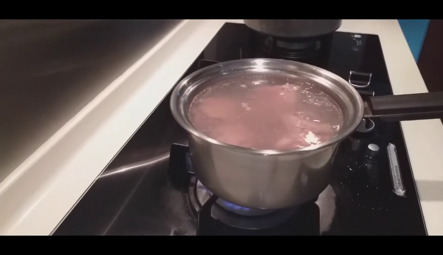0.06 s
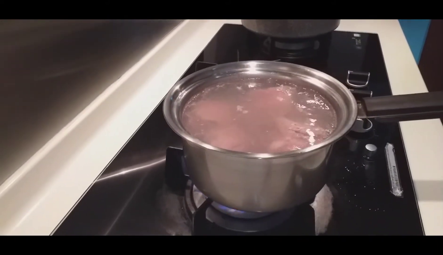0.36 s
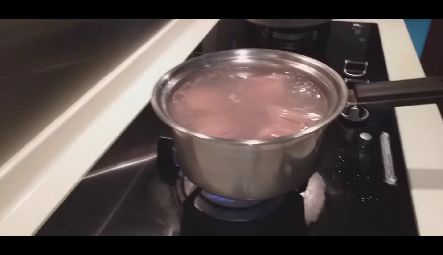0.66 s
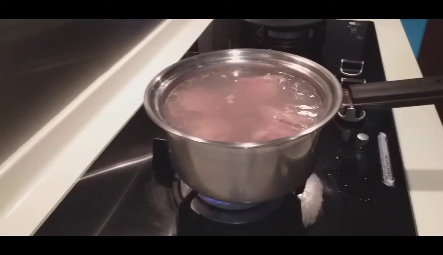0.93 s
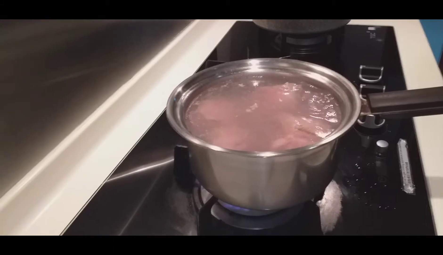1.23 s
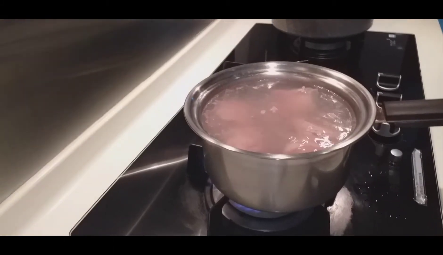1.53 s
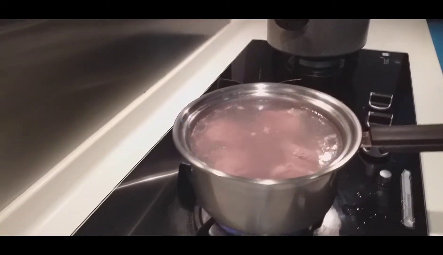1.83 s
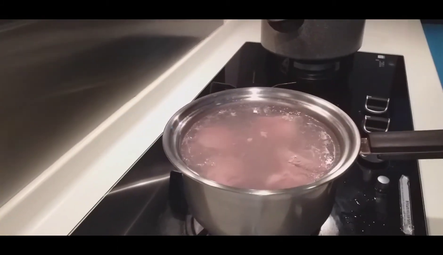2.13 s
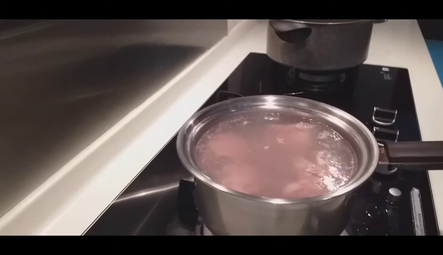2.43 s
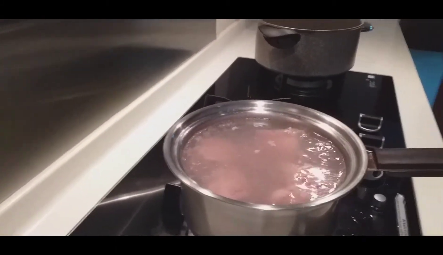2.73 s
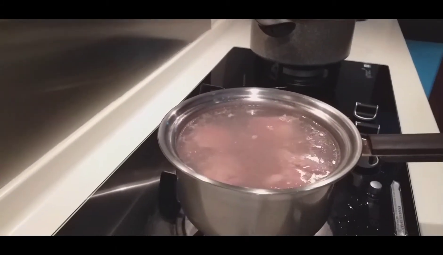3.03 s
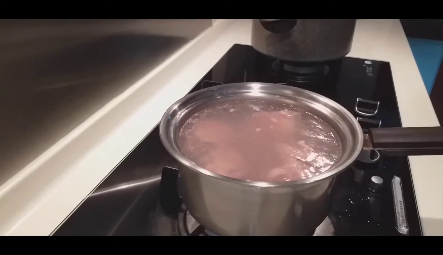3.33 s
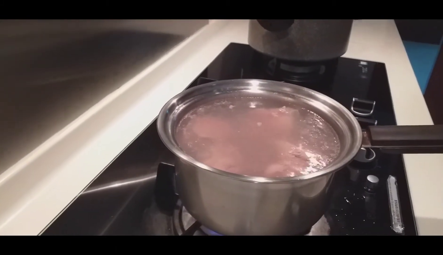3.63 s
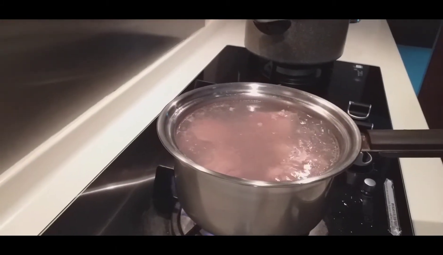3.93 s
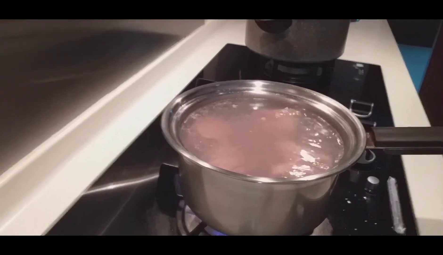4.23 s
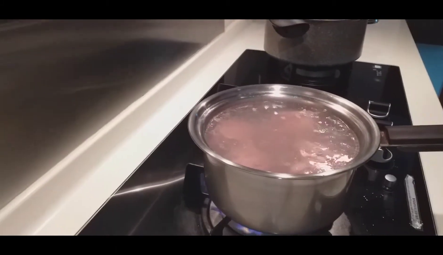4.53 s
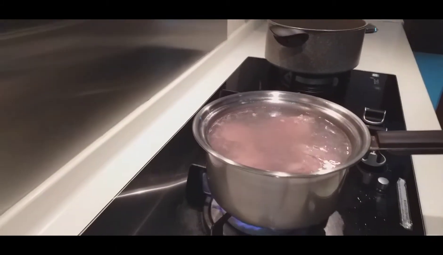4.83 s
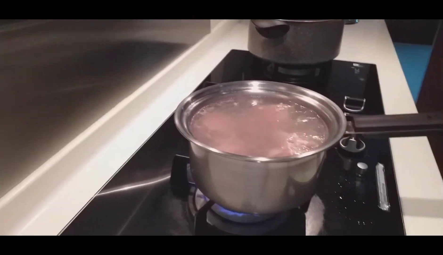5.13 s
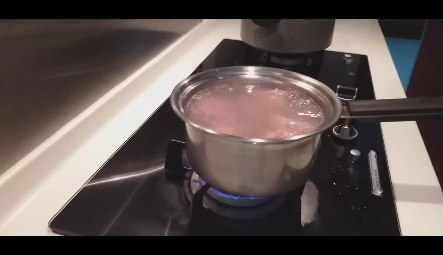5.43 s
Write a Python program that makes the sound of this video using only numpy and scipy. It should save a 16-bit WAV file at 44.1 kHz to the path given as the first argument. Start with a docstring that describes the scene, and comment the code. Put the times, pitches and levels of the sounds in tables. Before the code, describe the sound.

A bright simmering hiss and low gas burner rush in a small kitchen, interrupted by clacking dishes, hollow bumps and metallic taps.

```python
"""A sharp clack and a dull bump sound over the bright sizzle of a steel saucepan in a small kitchen.
The sizzle is tiny steam bubbles collapsing; larger ones pop, droplets spit and a gas flame rushes below.
Nearby, dishes are set down and a metal pot is tapped, ringing faintly, among a few hollow bumps.
Sizzle and flame sink around the loudest clatter and come back near the end, where the boil flares up."""
import sys
import numpy as np
from scipy import signal
from scipy.fft import rfft, irfft, next_fast_len
from scipy.io import wavfile

SR = 44100
rng = np.random.default_rng(int(sys.argv[2]) if len(sys.argv) > 2 else 0)


def output_pcm(signal):
    """Save a mono or channel-first signal as 16-bit PCM at the path in sys.argv[1].

    Samples are clipped to [-1, 1] before scaling.
    """
    pcm = np.clip(np.atleast_2d(signal).T, -1, 1) * 32767
    wavfile.write(sys.argv[1], SR, np.round(pcm).astype(np.int16))


N = 250488
TIME = np.arange(N) / SR

# The kitchen's echo. Each row: frequency in Hz, t60 (the seconds a sound takes to fade by 60 dB).
ROOM = [(100, 0.14), (500, 0.51), (2000, 0.58), (4000, 0.3), (8000, 0.43)]
WAVERS_PER_S = 9   # how quickly the levels of sizzle and spray wander


def from_db(db):
    """Turn decibels into a gain to multiply by."""
    return 10 ** (np.asarray(db) / 20)


def rms_one(x):
    """Scale a signal so that its average strength (rms) is 1."""
    return x / np.sqrt(np.mean(x ** 2) + 1e-20)


def at_hz(points, hz):
    """Read between the rows of a frequency table, with octaves evenly spaced."""
    row_hz, value = np.transpose(points)
    return np.interp(np.log(np.maximum(hz, 1)), np.log(row_hz), value)


def colour(x, spectrum):
    """Give a sound the tone of a table of Hz and dB; white noise keeps its power."""
    size = 2 * next_fast_len(len(x))
    gain = rms_one(from_db(at_hz(spectrum, np.linspace(0, SR / 2, size // 2 + 1))))
    cepstrum = irfft(np.log(gain))[:size // 2]
    cepstrum[1:] *= 2   # minimum phase: nothing sounds ahead of a click
    return irfft(rfft(x, size) * np.exp(rfft(cepstrum, size)))[:len(x)]


def band(x, low_hz, high_hz):
    """Keep the sound between two frequencies."""
    edges = np.clip([low_hz, high_hz], [10, 20], [.44 * SR, .45 * SR])
    return signal.sosfilt(signal.butter(2, edges, "band", fs=SR, output="sos"), x)


def ring(clicks, hz, t60):
    """Each click starts a fading tone as strong as the click."""
    decay = np.exp(-np.log(1000) / (t60 * SR))
    angle = 2 * np.pi * hz / SR
    return signal.lfilter([0, np.sin(angle)], [1, -2 * decay * np.cos(angle), decay ** 2], clicks + 1e-18)


def fade(t60):
    """A one-second curve that drops 60 dB every t60 seconds."""
    return np.exp(-np.log(1000) * TIME[:SR] / t60)


def ping(hz, t60):
    """One second of a fading pure tone."""
    return np.sin(2 * np.pi * hz * TIME[:SR]) * fade(t60)


def burst(hz, width_hz, envelope):
    """A puff of noise around a pitch, with the shape and energy of the envelope."""
    top_hz = width_hz / 2 + np.hypot(hz, width_hz / 2)
    sound = band(rng.standard_normal(SR + 2000), top_hz - width_hz, top_hz)[2000:] * envelope
    return sound * np.linalg.norm(envelope) / np.linalg.norm(sound)


def add(track, start_s, sound):
    """Mix a sound into the track at a given time."""
    start = max(round(start_s * SR), 0)
    track[start:start + len(sound)] += sound[:N - start]


def clicks_at(times, db):
    """Single clicks at given times and levels."""
    out = np.zeros(N)
    out[np.clip(np.round(times * SR).astype(int), 0, N - 1)] = from_db(db)
    return out


def drift(per_s):
    """A randomly wandering curve, typically about 1 away from zero."""
    knots = rng.standard_normal(4096)
    return rms_one(np.interp(TIME * per_s, np.arange(len(knots)), knots))


def grains(per_s, spread_db, clump_db):
    """Random clicks of uneven size, louder and softer in clumps."""
    sizes = from_db(spread_db * np.minimum(rng.exponential(1, N), 5)) * rng.choice([-1, 1], N)
    happens = rng.random(N) < per_s / SR
    return rms_one(sizes * happens * from_db(clump_db * drift(70)))


def room_tail():
    """One second of echo: noise in which each octave fades at its own speed."""
    edges = 40 * 2. ** np.arange(10)
    return sum(band(rng.standard_normal(SR), low, high) * fade(at_hz(ROOM, np.sqrt(low * high)))
               for low, high in zip(edges, edges[1:]))


TAIL = room_tail()


def in_kitchen(x, echo_db):
    """The direct sound plus its reflections from the walls."""
    return x + from_db(echo_db) * signal.fftconvolve(x, TAIL / np.linalg.norm(TAIL))[:N]


def dip(start_s=2.05, fall_s=0.64, depth_db=10.5, return_s=4.836, return_db_per_s=11.5):
    """The level change in dB shared by pan and flame: it falls, stays low, then climbs back."""
    fallen = depth_db * np.clip((TIME - start_s) / fall_s, 0, 1)
    regained = return_db_per_s * np.maximum(TIME - return_s, 0)
    return np.minimum(regained - fallen, 0)


def flame(dip_db, base_db=-44.5, flutter_db=0.8):
    """Swirling, burning gas makes a low rush, coloured by the pan above it."""
    # The tone of the rush. Each row: frequency in Hz, relative level in dB.
    rush_tone = [(25, -16), (50, -5.5), (85, -0.5), (160, 5.5), (250, 0.5), (350, 4.5), (430, -2),
                 (560, 0.5), (680, -4), (820, -0.5), (930, 6.5), (1050, -1.5), (1500, -4), (3000, -14.5)]
    level_db = base_db + dip_db - flutter_db * drift(25)
    return from_db(level_db) * colour(rng.standard_normal(N), rush_tone)


def bumps_and_plop(swell_s=0.0047, boom_width=0.32, boom_t60=0.35):
    """Hollow bumps, and one soft plop at 0.3 s: a few short tones, with the room booming around each."""
    # Bumps and plop. Each row: start in seconds, level in dB, pitch in Hz, relative boom level in dB.
    events = [(0.001, -6.5, 426, -24), (0.029, -1, 394, -10.5), (0.031, -12, 302, -8),
              (0.033, -10, 123.5, -10.5), (0.300, -32, 565, -8), (2.615, -9.5, 482, -3.5),
              (2.64, -23, 516, 7), (5.493, -28, 210, 1), (5.525, -17, 252, -21), (5.545, -30.5, 158, -1.5)]
    # The tones of a hollow sound. Each row: multiple of its pitch, relative level in dB, t60 in seconds.
    hollow_tones = [(1, -5, 0.11), (1.62, -10.5, 0.035), (3, -14, 0.0076)]
    out = np.zeros(N)
    swell = 1 - np.exp(-TIME[:SR] / swell_s)
    for start_s, db, pitch, boom_db in events:
        for multiple, tone_db, t60 in hollow_tones:
            hz = pitch * multiple
            tone = band(ping(hz, t60), hz / 2, hz * 2)
            boom = from_db(boom_db) * burst(hz, boom_width * hz, swell * fade(boom_t60))
            add(out, start_s, from_db(db + tone_db) * (tone + boom))
    return out


def push(clatter_db, tick_hz, glance_db_per_octave, square_hit_hz=2580):
    """How hard a hit moves a thing, in dB: a tick brighter than a square hit's is a glancing blow."""
    return clatter_db - glance_db_per_octave * np.log2(np.maximum(tick_hz / square_hit_hz, 1))


def knocks(hits, tones, glance_db_per_octave, ring_db, ring_echo_db, tick_t60,
           rattle_db, rattle_t60, tail_db, worktop_hz, worktop_db, worktop_t60):
    """Each hit gives a tick, an echoing rattle and a woody thump; the object and the worktop ring."""
    # The tone of the rattle. Each row: frequency in Hz, relative level in dB.
    rattle_tone = [(100, -23), (400, -29), (800, -26), (1300, -4.5), (2100, 4), (2700, 0), (3600, 4.5),
                   (5000, 2.5), (6000, -4.5), (7000, -21.5), (8500, -39), (16000, -47)]
    ticks, body = np.zeros(N), np.zeros(N)
    for start_s, tick_db, hz, clatter_db, thump_db in hits:
        tick = burst(hz, width_hz=hz, envelope=fade(tick_t60))
        add(ticks, start_s, from_db(tick_db - 6.5) * tick)
        dying = from_db(rattle_db) * fade(rattle_t60) + from_db(tail_db) * fade(at_hz(ROOM, hz))
        rattle = colour(rng.standard_normal(SR), rattle_tone) * dying
        add(body, start_s, from_db(clatter_db) * rattle)
        thump = burst(hz=247, width_hz=900, envelope=fade(0.32))
        add(body, start_s, from_db(thump_db) * band(thump, 85, 1800))
    soft_ticks = signal.sosfilt(signal.butter(8, 6400, fs=SR, output="sos"), ticks + 1e-18)

    times, _, tick_pitches, clatter_levels, thump_levels = np.transpose(hits)
    push_db = push(clatter_levels, tick_pitches, glance_db_per_octave) + ring_db
    ringing = np.zeros(N)
    for k, (hz, db, t60) in enumerate(tones):
        strikes = clicks_at(times, push_db + db + rng.normal(0, 2, len(times)))
        ringing += (-1) ** k * ring(strikes, hz, t60)   # every other tone starts the opposite way
    worktop = ring(clicks_at(times, thump_levels + worktop_db), worktop_hz, worktop_t60)
    worktop = band(worktop, worktop_hz / 2, worktop_hz * 2)
    return soft_ticks + body + worktop + in_kitchen(band(ringing, 200, 5700), ring_echo_db)


def crockery():
    """Dishes land on the worktop, clack and ring briefly."""
    # The landings. Each row: start in seconds, tick in dB, tick pitch in Hz, clatter in dB, thump in dB.
    landings = [(0.001, -6.5, 3990, -19, -21), (0.033, -6.5, 3700, -24, -21),
                (1.981, -19, 3350, -12.5, -23.5), (2.095, -4, 2830, -18.5, -27.5),
                (2.130, -15, 3200, -22.5, -32.5), (2.230, 3, 4020, -14, -31),
                (2.242, 1.5, 4500, -11.5, -48), (2.258, 3, 3260, -18.5, -31.5),
                (2.612, -4.5, 5200, -20.5, -38), (2.984, -19.5, 2230, -32, -41.5),
                (2.994, -13, 2020, -44, -51)]
    # The tones of a dish. Each row: pitch in Hz, relative level in dB, t60 in seconds.
    dish_tones = [(1750, -1, 0.15), (2000, 0, 0.12), (1964, 1, 0.19), (1980, -6, .15), (2360, -28, .14),
                  (2446, 6, 0.19), (2980, 0.5, 0.19), (3010, 11, 0.082), (3870, -7, .22), (4110, 1.5, 0.32),
                  (4370, -10.5, 0.119), (5000, -4, 0.11)]
    return knocks(landings, dish_tones, glance_db_per_octave=12, ring_db=-10.5, ring_echo_db=-11,
                  tick_t60=0.018, rattle_db=-5.5, rattle_t60=0.022, tail_db=-2.5,
                  worktop_hz=263.9, worktop_db=2, worktop_t60=0.26)


def pot_taps(glance_db_per_octave=16, thump_offset_db=-13):
    """A metal pot is tapped and rings; the squarer the hit, the more it thumps."""
    # The taps. Each row: start in seconds, tick in dB, tick pitch in Hz, clatter in dB.
    taps = [(3.3495, 1, 2690, -17.5), (3.463, -17, 2700, -33.5), (3.568, -36, 2820, -43),
            (3.795, 0, 3970, -26), (3.936, -28, 2270, -41), (4.057, -15.5, 3450, -35),
            (4.140, -3, 4330, -26.5), (4.175, -15, 3770, -32.5), (4.308, -19.5, 4220, -43.5)]
    # The tones of the pot. Each row: pitch in Hz, relative level in dB, t60 in seconds.
    pot_tones = [(489.3, -2.5, 0.26), (503, -23, 2.2), (506, -35, 0.25), (625, -12, 0.34),
                 (1008, -12.5, 0.75), (1068, -5, 0.24), (1100, -2.5, 0.19), (1476, -1, 0.17),
                 (1600, 0, 0.096), (2213, 5, 0.061), (2400, 3, 0.09), (3070, 5.5, 0.088), (3530, -16, 0.13),
                 (4390, 2, 0.083), (5400, -14, .15), (5330, -8, 0.15)]
    hits = []
    for start_s, tick_db, hz, clatter_db in taps:
        thump_db = push(clatter_db, hz, glance_db_per_octave) + thump_offset_db
        hits.append((start_s, tick_db, hz, clatter_db, thump_db))
    return knocks(hits, pot_tones, glance_db_per_octave, ring_db=-6, ring_echo_db=-4,
                  tick_t60=0.009, rattle_db=2.5, rattle_t60=0.05, tail_db=-4.5,
                  worktop_hz=214, worktop_db=6.5, worktop_t60=0.12)


def spray(boil_db, dip_db, base_db=-42.5, boil_share=0.69, waver_db=0.7):
    """The finest bubbles crackle very high; now and then a droplet spits on hot steel."""
    # Droplets hitting the pan's hot wall. Each row: start in seconds, level in dB.
    spits = [(0.508, -14.5), (0.8193, -21), (5.251, -29), (5.407, -25), (5.436, -16.5)]
    # The tone of the spray. Each row: frequency in Hz, relative level in dB.
    spray_tone = [(6000, -15), (9000, -13.5), (10500, -0.5), (12000, 3.5), (13400, 9.5), (15600, 1)]
    level_db = base_db + dip_db + boil_share * boil_db + waver_db * drift(WAVERS_PER_S)
    crackle = from_db(level_db) * grains(per_s=4400, spread_db=4.0, clump_db=2.2)
    for start_s, db in spits:
        add(crackle, start_s, from_db(db) * rng.standard_normal(SR) * fade(t60=0.011))
    return in_kitchen(colour(crackle, spray_tone), echo_db=-3.5)


def pops(simmer_db, loud_boost_db=1.5, small_per_s=13, small_db=-20.5, small_hz=5000, t60=0.013):
    """Larger bubbles snap with a brief ping: a few loud ones, and random small ones as the pan simmers."""
    # The loudest bubbles. Each row: start in seconds, level in dB before the boost, pitch in Hz.
    loud_pops = [(1.1129, -15, 4660), (1.1712, -14, 4300), (1.4296, -11, 4680), (1.6092, -13, 4170),
                 (5.0245, -21, 5470)]
    out = np.zeros(N)
    for start_s, db, hz in loud_pops:
        add(out, start_s, from_db(db + loud_boost_db) * ping(hz, t60))
    scatter_db = 1.5 * rng.standard_normal(N)
    scatter_octaves = 0.2 * rng.standard_normal(N)
    for i in np.flatnonzero(rng.random(N) < small_per_s / SR):
        db = small_db + simmer_db[i] + scatter_db[i]
        add(out, TIME[i], from_db(db) * ping(small_hz * 2 ** scatter_octaves[i], t60))
    return in_kitchen(band(out, 2000, 7500), echo_db=-8)


def sizzle(simmer_db, base_db=-31, waver_db=0.6, ring_cycles=22, pitch_count=28):
    """Steam bubbles collapse on the pan's floor, each ringing briefly at one of many pitches."""
    # The tone of the sizzle. Each row: frequency in Hz, relative level in dB.
    sizzle_tone = [(900, -30), (1400, -19), (2300, -10.5), (3300, -8.5), (4200, 0.5), (4900, -1),
                   (5600, 0.5), (6700, -8), (7600, -18.5), (8800, -37), (11000, -5.5), (16000, -55)]
    collapses = grains(per_s=9000, spread_db=1.0, clump_db=1.5)
    pitch_choice = rng.integers(0, pitch_count, N)
    fizz = np.zeros(N)
    for k, hz in enumerate(np.geomspace(1200, 8500, pitch_count)):
        bubbles = ring(collapses * (pitch_choice == k), hz, t60=ring_cycles / hz)
        fizz += np.sqrt(hz) * rms_one(bubbles)
    level_db = base_db + simmer_db + waver_db * drift(WAVERS_PER_S)
    return from_db(level_db) * rms_one(in_kitchen(colour(fizz, sizzle_tone), echo_db=-7))


def scene():
    """Pan, flame and kitchenware mixed into one channel."""
    # How hard the water boils. Each row: time in seconds, level change in dB.
    boil = [(0.2, 0.5), (1.9, 2.5), (2.9, 0), (4.4, 1), (4.75, 6), (5.1, 3.5), (5.19, -1), (5.38, 0.5),
            (5.43, 7.5), (5.65, 6)]
    boil_db = np.interp(TIME, *np.transpose(boil))
    dip_db = dip()
    simmer_db = boil_db + dip_db
    pan = sizzle(simmer_db) + pops(simmer_db) + spray(boil_db, dip_db)
    return (pan + flame(dip_db) + crockery() + pot_taps() + bumps_and_plop())[None]


def record(dry):
    """The microphone drops the bass below 50 Hz, rounds the peaks and cuts the treble above 15600 Hz."""
    thinned = signal.sosfilt(signal.butter(2, 50, "high", fs=SR, output="sos"), dry)
    rounded = 1.4 * np.tanh(thinned / 1.4)
    return signal.sosfilt(signal.ellip(12, .1, 80, 15600, fs=SR, output="sos"), rounded)


dry = scene()
out = record(dry)
output_pcm(out)
```